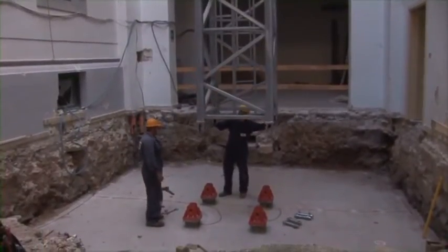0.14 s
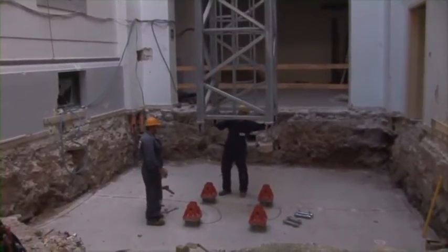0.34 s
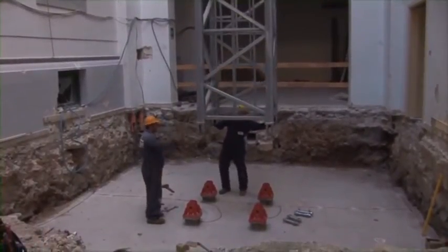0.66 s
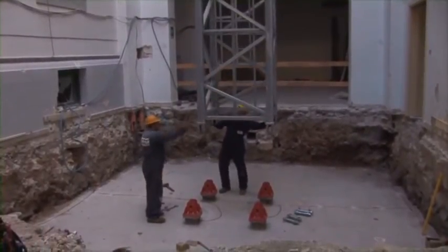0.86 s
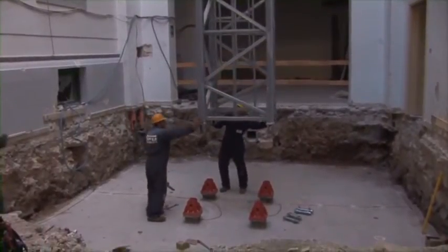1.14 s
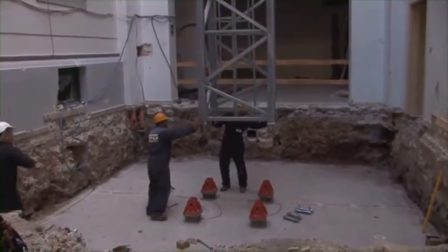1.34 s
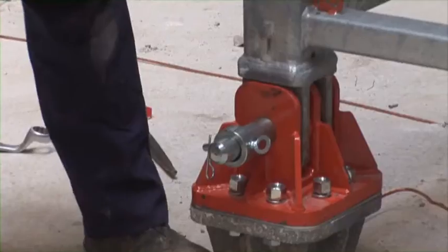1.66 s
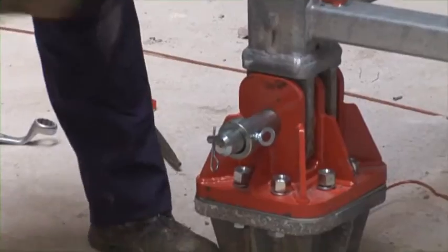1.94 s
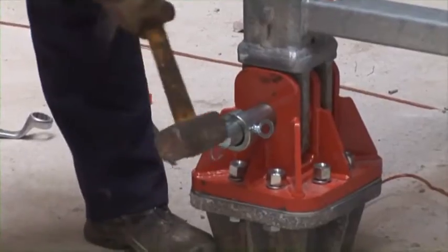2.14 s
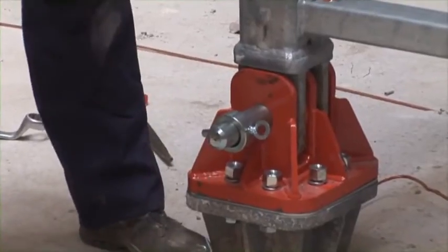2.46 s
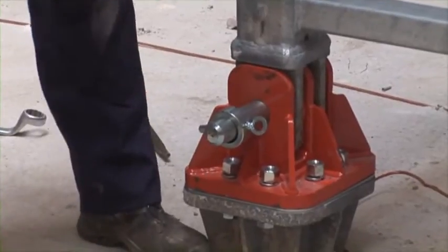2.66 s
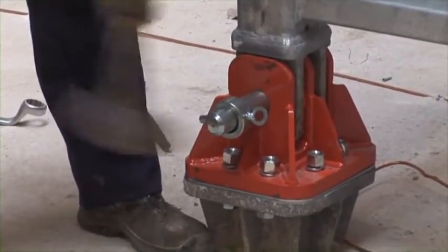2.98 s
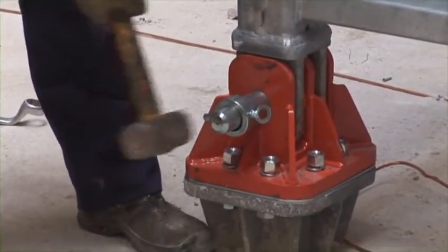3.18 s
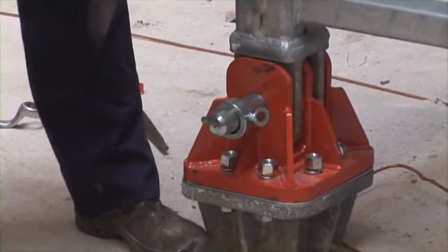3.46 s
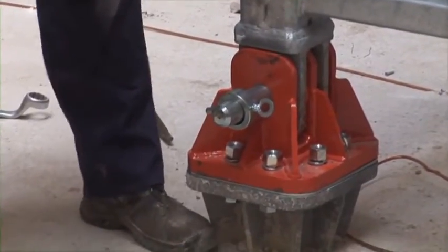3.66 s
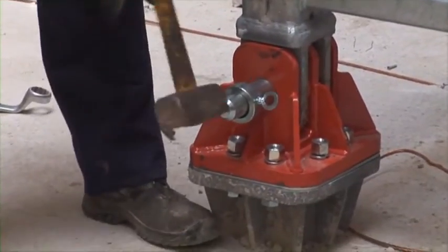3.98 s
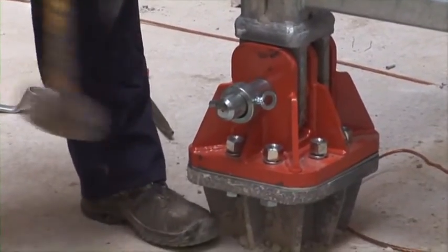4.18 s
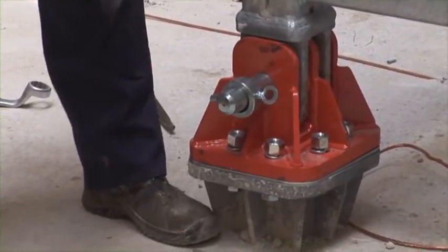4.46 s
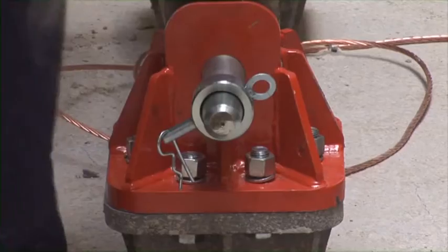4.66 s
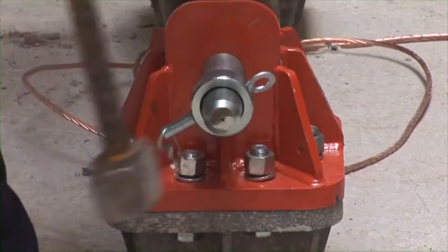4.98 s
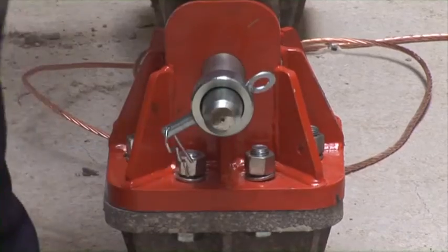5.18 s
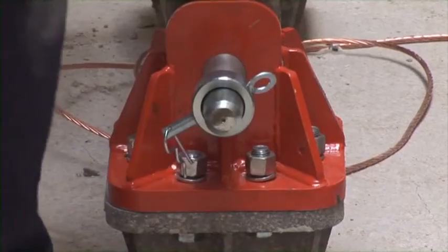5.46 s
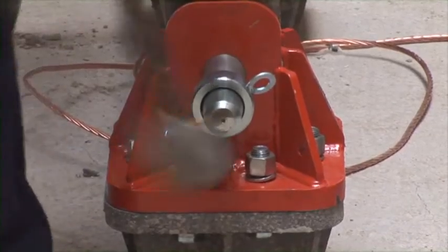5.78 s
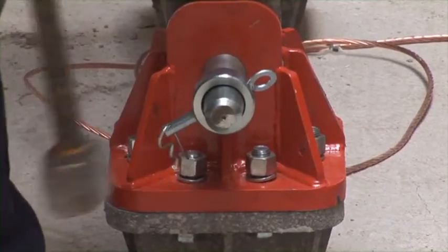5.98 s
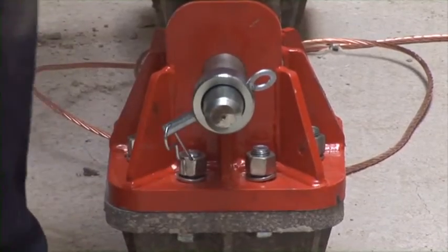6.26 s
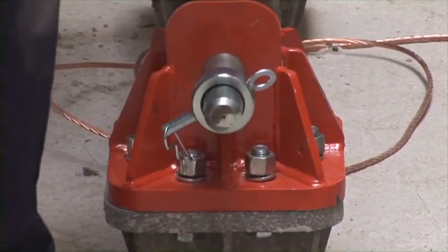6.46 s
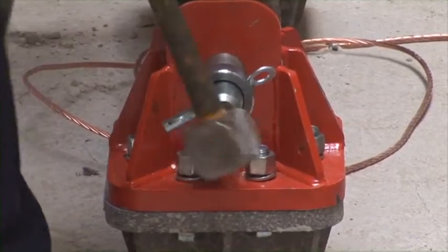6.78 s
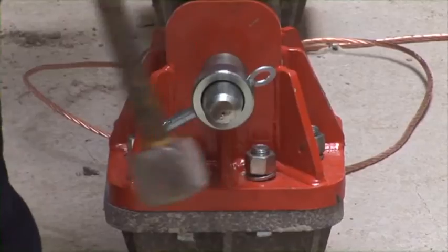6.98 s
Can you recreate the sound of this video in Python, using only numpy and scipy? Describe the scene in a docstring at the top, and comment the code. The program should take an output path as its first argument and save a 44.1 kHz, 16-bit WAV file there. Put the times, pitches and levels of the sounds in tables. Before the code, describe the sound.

A mobile crane's diesel opens the scene, a steady low drone with a boom near 66 Hz, gritty combustion noise and a slight throb. It eases a little around 0.9 s, then fades evenly from 1.25 to 1.8 s. A light, bright steel clink sounds at 1.2 s. The yard falls nearly quiet, with only faint distant town rumble and wavering machine hum. At 2.2, 3.1 and 4.0 s a sledgehammer hits a pin in a heavy steel foot: a hard crack, a piercing clang rich around 2 to 6 kHz, and a ring from the mast above. A very faint clink comes at 4.7 s. Three more blows at 4.9, 5.9 and 6.9 s strike a second foot, with a different ring and a more hollow knock. House walls answer each blow with quick echoes and a one-to-two-second tail, overlapping the next; the last is still ringing at the end.

```python
"""A walled building yard: a mobile crane's six-cylinder diesel drones, steel clinks lightly, the diesel's drone
fades out. Then a sledgehammer drives the pins of a tower mast's steel feet: three blows on one foot, three on
the next. Each blow is a direct crack of noise, a ring of damped sines and resonances of pin, foot and mast, and
a reverberation between the house walls. Filtered noise and wavering hums make a faint town in the distance. All
of it meets at one microphone."""
import sys
import numpy as np
from scipy import signal
from scipy.fft import rfft, irfft, next_fast_len
from scipy.io import wavfile
from scipy.ndimage import map_coordinates

SR = 44100
rng = np.random.default_rng(int(sys.argv[2]) if len(sys.argv) > 2 else 0)


def store_wav(level_fs):
    """Save 16-bit WAV to argv[1]."""
    pcm = np.round(np.clip(np.atleast_2d(level_fs), -1, 1) * 32767)
    wavfile.write(sys.argv[1], SR, pcm.T.astype(np.int16))


N = 313979


def amp(db):
    """Amplitude factor of a level in dB."""
    return 10 ** (np.asarray(db) / 20)


def unit(x):
    """x scaled to rms 1."""
    return x / np.sqrt(np.mean(x ** 2) + 1e-20)


def along(points, hz):
    """Values at hz, read between (frequency [Hz], value) points on a log frequency axis."""
    point_hz, value = np.transpose(points)
    return np.interp(np.log(hz + 1), np.log(point_hz + 1), value)


def wobble(rate):
    """A smooth random curve with the given number of knots a second."""
    knots = rng.standard_normal(int(N * rate / SR) + 4)
    return map_coordinates(knots, [np.arange(N) * rate / SR])


def ramp(start_s, length_s):
    """Rises evenly from 0 to 1, then stays."""
    return np.clip((np.arange(N) / SR - start_s) / length_s, 0, 1)


def filtered(x, gain):
    """x through a zero-phase filter whose factor is gain(Hz)."""
    size = next_fast_len(N + SR // 2)
    return irfft(rfft(x, size) * gain(np.fft.rfftfreq(size, 1 / SR)), size)[:N]


def coloured(x, spectrum):
    """x shaped by a spectrum, at rms 1."""
    return unit(filtered(x, lambda hz: amp(along(spectrum, hz))))


def bump(hz, centre_hz, width_hz, db):
    """The dB that one cluster of close resonances adds."""
    return db * np.exp2(-(2 * (hz - centre_hz) / width_hz) ** 2)


def ripple(hz, spacing_hz, depth_db):
    """Random hills and dips along a spectrum, in dB."""
    return depth_db * map_coordinates(rng.standard_normal(size=2048), [hz / spacing_hz])


def struck(x, colour, size=8192):
    """x through the causal minimum-phase response whose dB gain is colour(Hz)."""
    cepstrum = irfft(np.log(amp(colour(np.fft.rfftfreq(size, 1 / SR)))))
    # folding the cepstrum forward in time makes the response causal
    cepstrum[1:size // 2] *= 2
    cepstrum[size // 2 + 1:] = 0
    response = irfft(np.exp(rfft(cepstrum)))
    return signal.fftconvolve(x, response)[:len(x)]


def ringing(modes, t, scatter_db=2):
    """Damped sines, each (frequency [Hz], level [dB], t60 [s]), at a random strength and sign."""
    total = np.zeros(len(t))
    for hz, db, t60 in modes:
        strength = amp(db + scatter_db * rng.normal()) * rng.choice([-1, 1])
        decay = np.exp(-np.log(1000) * t / t60)
        total += strength * decay * np.sin(2 * np.pi * hz * t)
    return total


def add(track, s, sound):
    """Mix a sound into the track at time s."""
    part = track[round(s * SR):][:len(sound)]
    part += sound[:len(part)]


# tones of the crane's engine: (multiple of crankshaft speed, relative level [dB])
ENGINE_ORDERS = [(1.5, -25), (4.5, -21.5), (6.5, -16), (7.5, -12.5), (9, -9), (10, -17.5), (14, -19),
                 (18, -17), (19.5, -19.5), (22, -14.5), (27, -18), (31.5, -25.5), (33, -18), (45, -17.5),
                 (48, -20.5), (51, -20.5), (58.5, -18), (61.5, -22), (63.5, -27), (72, -33), (84, -23)]
# combustion noise of the engine: (frequency [Hz], relative level [dB per Hz])
COMBUSTION_SPECTRUM = [(20, -40), (40, -27), (110, -12), (160, -7), (290, -4.5), (340, -14.5), (450, -11),
                       (600, -15.5), (1300, -13.5), (2000, -19.5), (3200, -27.5), (3600, -31.5),
                       (5900, -35), (7100, -49), (9500, -47.5), (14000, -43), (16000, -51)]
FIRING_HZ = 65.72  # mean firings a second of all six cylinders
CASING_DB, BOOM_DB = -28, -31  # casing noise and exhaust boom
EASE_AT_S, EASE_S, EASE_DB = 0.94, .15, 0.8  # eases off: start, duration, drop
FADE_FROM_S, FADE_TO_S = 1.25, 1.822  # fades evenly to nothing


def diesel(roar_db=-1.5, tones_db=0, boom_waver_db=1.1, throb=0.1, clatter=0.11, waver_db=2, drift=0.43, hunt=0.001):
    """Three firings a crank turn: an exhaust boom, engine orders, and combustion noise that throbs."""
    firing = 2 * np.pi * np.cumsum(FIRING_HZ * (1 + hunt * wobble(2.87))) / SR
    crank = firing / 3
    boom = np.sqrt(2) * amp(BOOM_DB + boom_waver_db * wobble(8.0)) * np.sin(firing)

    # the cycle repeats every two turns, so tones lie on half orders
    tones = np.zeros(N)
    for order, db in ENGINE_ORDERS:
        level = np.sqrt(2) * amp(db + waver_db * wobble(7.13))
        phase = drift * wobble(11.0) + rng.uniform(0, 2 * np.pi)
        tones += level * np.sin(order * crank + phase)

    # unequal cylinders throb; valves and injectors clatter four times a firing
    throbbing = throb * (np.sin(firing) + np.sin(2 * crank)) / 2
    pulsing = np.exp(throbbing + clatter * np.sin(4 * firing))
    roar = coloured(pulsing * rng.standard_normal(N), COMBUSTION_SPECTRUM)
    casing = amp(tones_db) * tones + amp(roar_db + 0.16 * wobble(11.0)) * roar

    easing = amp(-EASE_DB * ramp(EASE_AT_S, EASE_S))
    fade = 1 - ramp(FADE_FROM_S, FADE_TO_S - FADE_FROM_S)
    return easing * fade * (boom + amp(CASING_DB) * casing)


# town rumble beyond the walls: (frequency [Hz], relative level [dB per Hz])
TOWN_SPECTRUM = [(25, -20), (70, -12), (130, -8), (180, -9.5), (280, 1.5), (450, -13), (750, -6.5),
                 (1200, -6), (2200, -13), (3500, -20), (5500, -31), (7500, -41), (15000, -41)]
# hum of far machines: (frequency [Hz], relative level [dB])
MACHINE_HUMS = [(184, -1.5), (274, 2), (1145, 1.5)]


def town(rumble_db=-63.0, hum_db=-70):
    """Distant traffic as filtered noise, with far machines as sines wavering in level and phase."""
    t = np.arange(N) / SR
    hum = np.zeros(N)
    for hz, db in MACHINE_HUMS:
        hum += amp(db + 5 * wobble(4.6)) * np.sin(2 * np.pi * hz * t + wobble(30))
    rumble = coloured(rng.standard_normal(N), TOWN_SPECTRUM)
    return amp(rumble_db + wobble(1.4)) * rumble + amp(hum_db) * hum


# main reverberation between the house walls: (frequency [Hz], t60 [s])
YARD_T60 = [(100, 2.8), (260, 2.17), (700, 1.64), (1840, 1.41), (3500, 1.052), (5500, 0.89), (8000, 0.67),
            (12800, 0.47), (16000, 0.36)]


def yard(late_db=-25, late_stretch=2.28, wall_db=13, count=14):
    """Two seconds of the yard's answer: single wall echoes in a diffuse tail, and a weak longer tail."""
    hz, t, noise = signal.stft(rng.standard_normal(2 * SR), SR, nperseg=256)
    fall_db = -60 * t / along(YARD_T60, hz)[:, None]
    decay = np.hypot(amp(fall_db), amp(late_db + fall_db / late_stretch))
    tail = signal.istft(noise * decay, SR, nperseg=256)[1][:2 * SR]
    # the nearest walls answer within a tenth of a second, the farther ones more weakly
    delay_s = rng.uniform(.006, .09, count)
    echoes = amp(wall_db - 90 * delay_s) * rng.choice([-1, 1], count)
    return tail + np.bincount((delay_s * SR).astype(int), echoes, len(tail))


# light clinks: (time [s], level [dB], contact decay constant [s], echo fade constant [s],
# ping frequency [Hz], ping level relative to the clink [dB])
CLINK_EVENTS = [(1.207, -25, 0.0028, 4, 9350, -31), (4.738, -57, .006, 0.147, 3720, 2.5)]
# colour of the clinking steel: (frequency [Hz], gain [dB])
CLINK_COLOUR = [(300, -33), (1500, 1.5), (2600, 6.5), (5600, 4), (7200, -13), (8900, -9), (9350, -1.5),
                (9900, -9.5), (15000, -14)]


def clinks(yard_db=-9):
    """Light taps of steel: a short noise contact and one small damped ping, echoing in the yard."""
    out, t = np.zeros(N), np.arange(2 * SR) / SR
    for s, db, contact_s, fade_s, ping_hz, ping_db in CLINK_EVENTS:
        tick = rng.standard_normal(len(t)) * np.exp(-t / contact_s)
        echo = amp(yard_db) * yard() * np.exp(-t / fade_s)
        ping = ringing([(ping_hz, ping_db, .12)], t)
        tap = struck(tick + echo, lambda hz: along(CLINK_COLOUR, hz))
        add(out, s, amp(db) * (tap + ping))
    return out


def crack(centre_hz, knock_db, length=0.0083, rise=0.00032):
    """A few milliseconds of steel on steel, heard directly, with a hollow knock of the base plate."""
    t = np.arange(2 * SR) / SR
    burst = rng.standard_normal(len(t)) * np.exp(-(t / length) ** 2) * (1 - np.exp(-t / rise))
    # colour of the contact: (frequency [Hz], gain [dB])
    contact = [(60, -21.0), (350, -4.5), (750, -10), (1200, 10.0), (1600, 4), (4000, 5.0),
               (5500, -15.0), (7500, -15.0), (10000, -3.0), (15500, -10.0)]

    def colour(hz):
        """Contact colour with the crack's own peak and the plate's knock, in dB."""
        return along(contact, hz) + bump(hz, centre_hz, 900, 12) + bump(hz, 1100, 600, knock_db)

    return struck(burst, colour)


# hammer blows: (time [s], ring level [dB], crack level [dB], crack centre [Hz], plate knock [dB],
# brightness [dB per octave], bass thud [dB], favoured resonance [Hz], its gain [dB],
# pin resonance [Hz], its width [Hz], its gain [dB], singing tone [Hz], its relative level [dB])
HAMMER_BLOWS = [(2.169, -1.5, -19.5, 2360, -7, 0.44, 4, 2190, 0.5, 5270, 910, 10, 5080, -12.5),
                (3.1062, -0.5, -23, 2770, 1.5, 0.77, 1.5, 914, 12.5, 5600, 850, 15, 5970, -9),
                (4.0136, 2.5, -19.5, 2260, -5, 0.03, -1, 1360, 2.5, 6050, 620, 10, 6110, -5),
                (4.9129, 1, -21, 2900, 5.5, 0.76, -0.5, 2940, 7.5, 4900, 700, 8.5, 5320, -10),
                (5.8958, 0, -21.5, 2700, 5.5, 0.78, -.5, 2970, 6.5, 4830, 450, 7.5, 4910, -3.5),
                (6.863, -1.5, -23.5, 3310, 5, 0, -2, 3500, -1, 5160, 420, 11, 4880, -1)]
# broad colour of the first and the second foot: (frequency [Hz], gain [dB])
FIRST_FOOT_BODY = [(40, -25), (130, -17), (310, -3), (530, -8.5), (800, -8.5), (1150, -0.5), (1700, -4.5),
                   (2600, 1), (3800, -4), (5500, 0), (6500, -4), (7600, -13.5), (11000, -10), (15500, -12)]
SECOND_FOOT_BODY = [(40, -17), (110, -11.5), (178, 4), (255, -12), (420, 0.5), (600, -7), (1100, 0),
                    (1500, -5.5), (2800, 4.5), (4300, 3.5), (5700, -2.5), (7600, -11.5), (10000, -4),
                    (15500, -8.5)]
# resonances of each foot: (frequency [Hz], width [Hz], gain above the body [dB])
FIRST_FOOT_RESONANCES = [(735, 50, 6.5), (1280, 165, 6.5), (1475, 31, 9.5), (1686, 68, 6.5),
                         (2080, 110, 11.5), (2263, 160, 8), (3010, 200, 6), (3870, 150, -4),
                         (4050, 76, 5.5), (4520, 310, 4.5), (4980, 180, 3.5), (8680, 940, 5.5),
                         (9200, 100, 9.5), (12580, 200, 8)]
SECOND_FOOT_RESONANCES = [(310.3, 20, 11), (695, 24, 9.6), (866, 132, 9), (1694, 70, 6.5), (2204, 230, 6.1),
                          (2700, 77, 2.4), (2840, 140, 1.6), (3164, 85, 4), (4160, 80, 3), (5950, 58, 5.6),
                          (8930, 300, 4), (12800, 44, 7.1)]
# long-ringing modes of each foot: (frequency [Hz], relative level [dB], t60 [s])
FIRST_FOOT_MODES = [(2128, -18, 1.4), (4080, -14, .7), (4612, -13, .7), (5092, -9, .7), (5606, -10, .7),
                    (5689, -9, .7), (5879, -9, .7), (6092, -9, .7), (6350, -17, .6), (9300, -19, .65),
                    (10600, -22, .5)]
SECOND_FOOT_MODES = [(2242, -13, .85), (3126, -7, .9), (3488, -12, .7), (4130, -14, .7), (4683, -9, .65),
                     (4944, -9, .7), (4990, -10, .7), (5080, -11, .7), (6100, -15, .6), (9450, -18, .6),
                     (10200, -18, .6), (10600, -18, .5), (11200, -16, .5), (11600, -17, .5)]
# the lattice mast above rings on after every blow: (frequency [Hz], relative level [dB], t60 [s])
MAST_MODES = [(156, -26, 3.7), (700, -28.5, 3.7), (843, -21, 2.3), (1206, -22, 2.2), (1290, -22.5, 2.63),
              (1498, -21.5, 2.34), (1716, -20.5, 2.53), (1788, -18.5, 1.7), (2290, -24, 2.1),
              (2205, -20, 2.1), (2800, -23, 1.8), (2810, -20.5, 1.8)]
SECOND_FOOT_S = 4.7  # blows from here on land on the second foot
MODES_DB = -31  # level of all the long-ringing modes


def hammer(yard_db=-22.0, thud_hz=250):
    """Each blow rings mast, foot and pin, whose pitch shifts as it seats; the yard prolongs the ring."""
    out, t = np.zeros(N), np.arange(2 * SR) / SR
    for (s, ring_db, crack_db, crack_hz, knock_db, bright_db, thud_db, spot_hz, spot_db,
         pin_hz, pin_width_hz, pin_db, tone_hz, tone_db) in HAMMER_BLOWS:
        if s < SECOND_FOOT_S:
            body, resonances, modes = FIRST_FOOT_BODY, FIRST_FOOT_RESONANCES, FIRST_FOOT_MODES
        else:
            body, resonances, modes = SECOND_FOOT_BODY, SECOND_FOOT_RESONANCES, SECOND_FOOT_MODES
        # the spot where the hammer lands favours one resonance
        spot = (spot_hz, 0.097 * spot_hz, spot_db)
        peaks = [*resonances, spot, (pin_hz, pin_width_hz, pin_db)]

        def colour(hz):
            """The steel's answer to this blow, in dB."""
            brightness = bright_db * np.log2((hz + 100) / 2500)
            thud = thud_db / (1 + (hz / thud_hz) ** 2)
            # countless small modes, excited anew by each blow, cluster in the treble
            treble = np.clip((hz - 6000) / 1500, 0, 1)
            small_modes = ripple(hz, 45, 1.1) + ripple(hz, 380, 1.4) * treble
            return along(body, hz) + sum(bump(hz, *peak) for peak in peaks) + brightness + thud + small_modes

        clang = amp(yard_db) * struck(yard(), colour)
        ring = amp(MODES_DB) * ringing([*modes, *MAST_MODES, (tone_hz, tone_db, .75)], t)
        direct = amp(crack_db) * crack(crack_hz, knock_db)
        add(out, s, amp(ring_db) * (clang + ring) + direct)
    return out


def scene():
    """Crane, steel, hammer and town at one microphone."""
    return (diesel() + town() + clinks() + hammer())[None]


TOP_HZ = 16800  # band limit: 80 dB down from here up


def record(dry):
    """The camera rounds off the highest peaks and cuts steeply towards its band limit."""
    rounded = dry[0] / (1 + (dry[0] / .35) ** 4) ** (1 / 4)
    band_limit = signal.cheby2(16, 80, TOP_HZ, fs=SR, output="sos")
    return signal.sosfilt(band_limit, rounded)[None]


dry = scene()
out = record(dry)
store_wav(out)
```